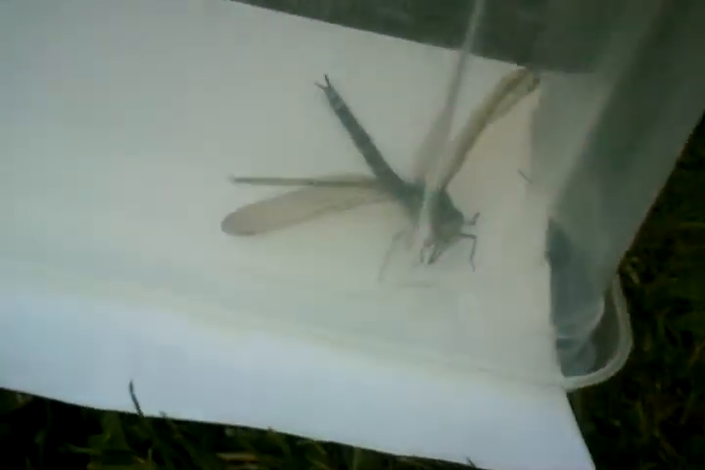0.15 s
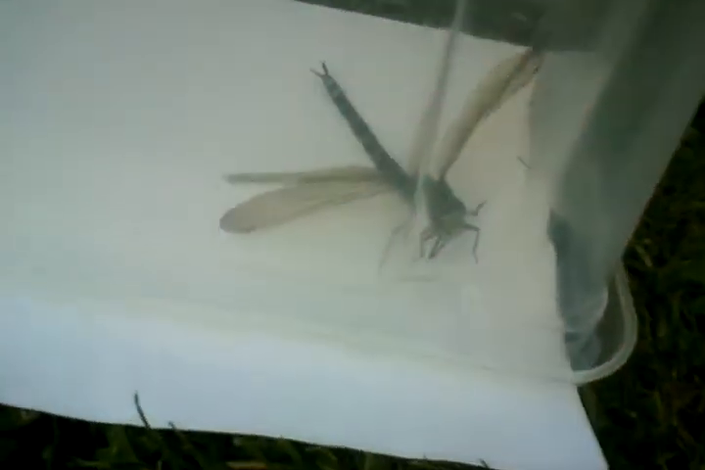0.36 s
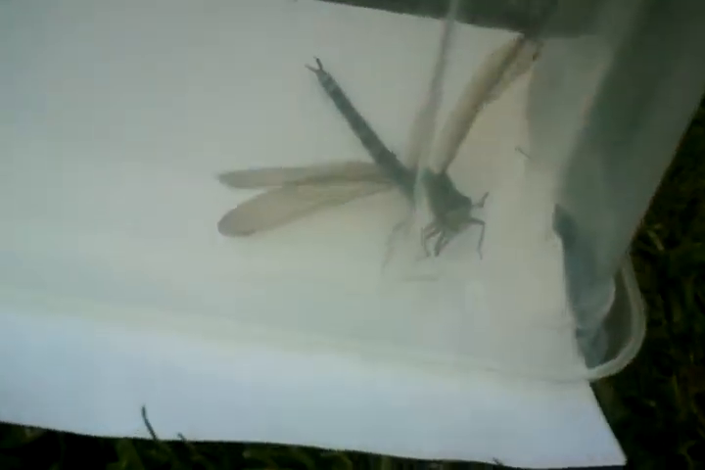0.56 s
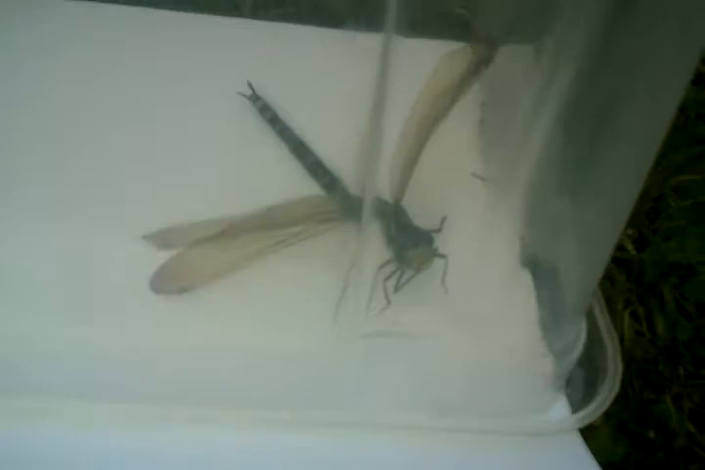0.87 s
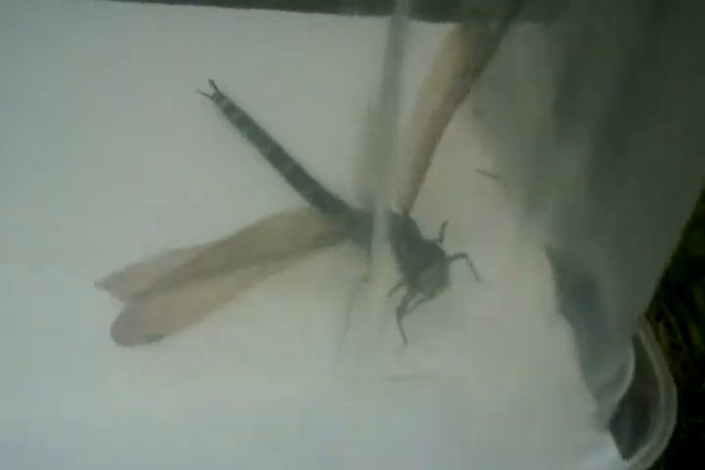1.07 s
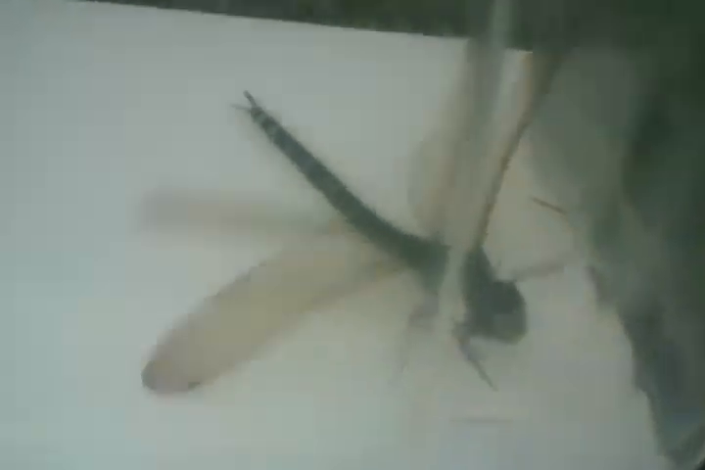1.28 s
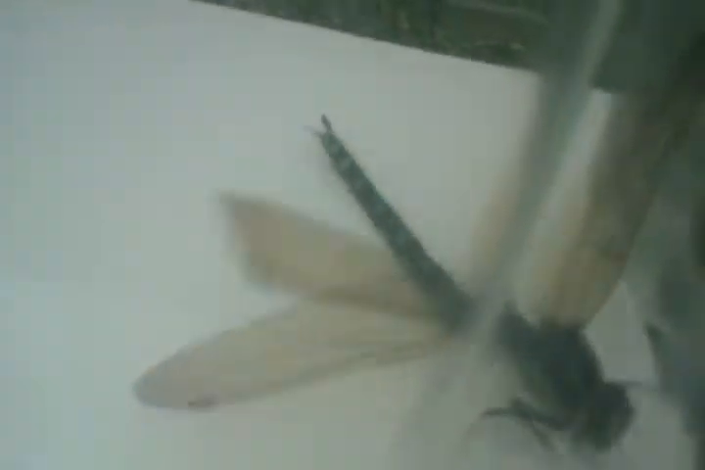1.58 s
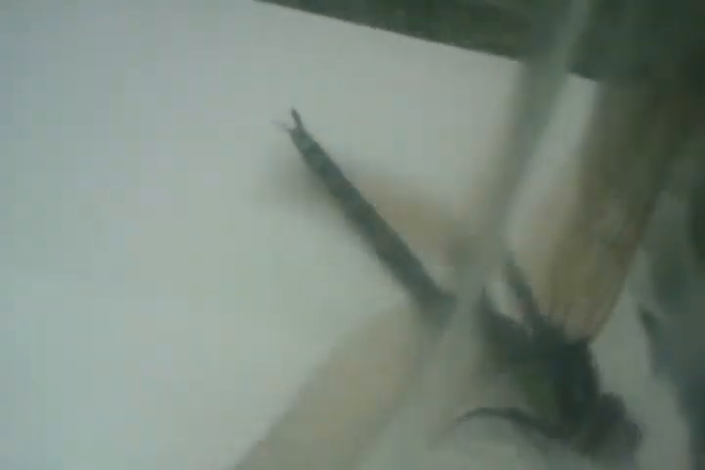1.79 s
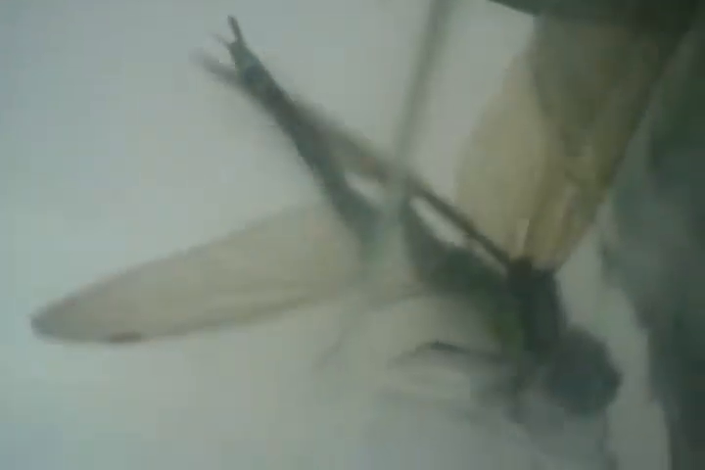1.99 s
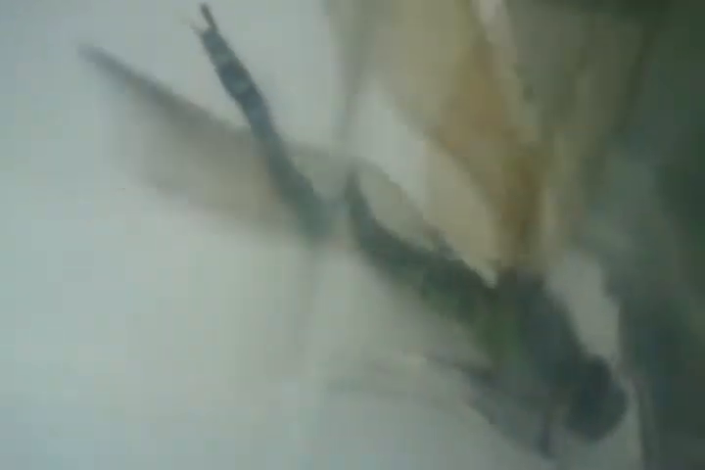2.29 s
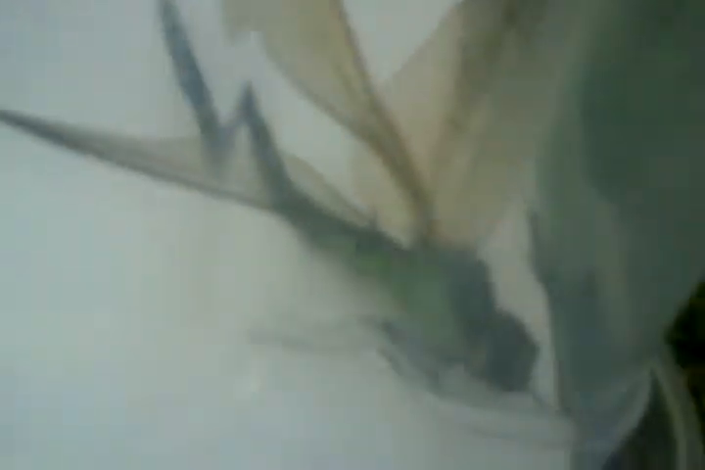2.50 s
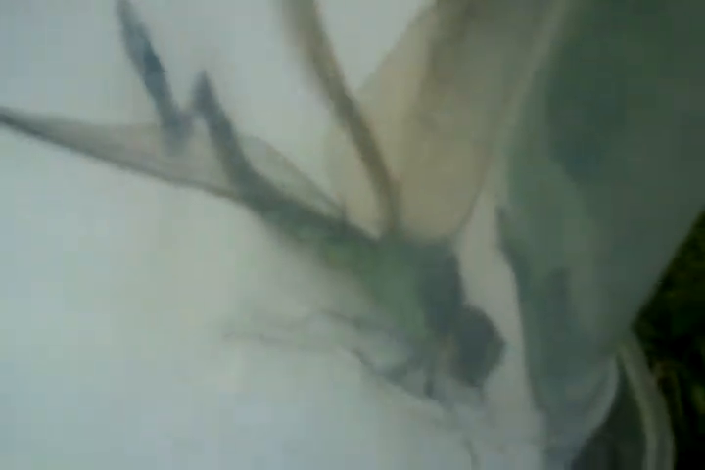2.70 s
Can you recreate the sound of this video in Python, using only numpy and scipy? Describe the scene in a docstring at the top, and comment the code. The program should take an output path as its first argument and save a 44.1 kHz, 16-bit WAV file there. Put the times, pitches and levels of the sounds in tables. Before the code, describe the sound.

A dragonfly rustles its wings and scrabbles in a plastic tub, making faint, uneven ticks, with a few sharper taps near the end. Outdoors, distant traffic rumbles and engines drone under a steady microphone hiss.

```python
"""On a lawn, a dragonfly in a plastic tub scrabbles, rubs its wings on the wall and beats them briefly.
Claws and wing veins tap the thin wall, which rings for a moment: each tap is a tick.
A dragging wing makes thousands of tiny taps a second, which blur into a rustle.
Behind it, far road traffic rumbles and engines drone over a steady microphone hiss."""
import sys
import numpy as np
from scipy import signal
from scipy.io import wavfile

SR = 44100
rng = np.random.default_rng(int(sys.argv[2]) if len(sys.argv) > 2 else 0)


def master_out(mix):
    """Clip the mix to full scale and print it as 16-bit PCM to the path in sys.argv[1]."""
    frames = np.transpose(np.atleast_2d(mix))
    ceiling = np.clip(frames, -1, 1)
    pcm = np.round(ceiling * 32767).astype(np.int16)
    wavfile.write(sys.argv[1], SR, pcm)


N = 125244

# The tones at which the tub's wall rings. Each row: pitch in Hz, relative level in dB,
# seconds to fade by 60 dB, group (0 low, 1 middle, 2 high, 3 top).
WALL_TONES = [(1450, 0, .016, 0), (1950, 0, .015, 0), (2550, 0, .013, 0), (3100, -2, .012, 0),
              (4050, -3, .012, 1), (4600, 0, .012, 1), (5150, -1, .011, 1), (5900, 0, .011, 2),
              (6550, -1, .010, 2), (7100, 0, .010, 2), (7750, 1, .009, 3), (8250, 4, .008, 3),
              (8750, 6, .006, 3)]


def from_db(db):
    """Turn decibels into a number to multiply a sound by."""
    return 10 ** (np.asarray(db) / 20)


def unit_level(sound):
    """Scale a sound so that its average (RMS) level is 1."""
    return sound / np.sqrt(np.mean(sound ** 2) + 1e-20)


def curve(rows, column=1):
    """Join a column's values with straight lines; each row starts with a time in seconds."""
    columns = np.transpose(rows)
    return np.interp(np.arange(N) / SR, columns[0], columns[column])


def drift(rate_hz):
    """A slow, smooth random wander, about 1 in size."""
    step, warm_up = 40, 2000  # one value every 40 samples; the first 2000 values are dropped
    keep = np.exp(-2 * np.pi * rate_hz * step / SR)
    noise = rng.standard_normal(N // step + warm_up + 2)
    slow = signal.lfilter([1], [1, -2 * keep, keep * keep], noise)[warm_up:]
    return np.interp(np.arange(N) / step, np.arange(len(slow)), unit_level(slow))


def ring(pushes, hz, fade_s):
    """Every push starts a tone that dies away by 60 dB in fade_s seconds."""
    keep = from_db(-60 / (fade_s * SR))
    angle = 2 * np.pi * hz / SR
    return signal.lfilter([0, np.sin(angle)], [1, -2 * keep * np.cos(angle), keep * keep], pushes + 1e-18)


def microphone_hiss():
    """The microphone's own even noise, with a broad lift in the treble."""
    white = rng.standard_normal(N)
    treble = unit_level(ring(white, hz=7400, fade_s=0.00074))
    return from_db(-57.5) * (white + from_db(-9.5) * treble)


def road_rumble():
    """Far traffic: bands of noise a quarter of an octave wide, each flickering slightly."""
    # The traffic's balance from bass to treble. Each row: pitch in Hz, relative level in dB.
    spectrum = [(12, -2.5), (22, -1.5), (30, -7.5), (45, -7.5), (100, -9.5), (160, -11), (340, -14),
                (520, -14.5), (660, -17.5), (780, -12), (1000, -13.5), (1150, -18.5), (1350, -22),
                (1900, -28), (2400, -35), (3300, -41), (5000, -61.5)]
    # Its gentle rise and fall. Each row: time in seconds, change in dB below split_hz, and above it.
    swells = [(0, -0.5, 1.5), (.35, 0, 0.5), (.7, -1, 0.5), (1.05, 1, 0.5), (1.4, -0.5, 0),
              (1.75, 0.5, -0.5), (2.1, 0.5, -1.5), (2.45, 0.5, -0.5), (2.84, 1, -2)]
    split_hz, flicker_db = 700, 0.47
    low_swell, high_swell = curve(swells, column=1), curve(swells, column=2)
    hz, db = np.transpose(spectrum)
    edges_hz = 10 * 2 ** np.arange(0, 9.3, 1 / 4)
    white = rng.standard_normal((2, N + SR))  # an extra second lets the filters settle
    rumble = 0
    for k, (low, high) in enumerate(zip(edges_hz, edges_hz[1:])):
        band_filter = signal.butter(2, [low, high], "band", fs=SR, output="sos")
        band = signal.sosfilt(band_filter, white[k % 2])[SR:]
        band_db = np.interp(np.log(low * high) / 2, np.log(hz), db)
        swell_db = high_swell if low > split_hz else low_swell
        rumble += band * from_db(band_db + swell_db + flicker_db * drift(rate_hz=2))
    return from_db(-39) * unit_level(rumble)


def engine_drones():
    """Far engines: noise narrowed twice around each pitch becomes a low, wavering note."""
    # The engine notes. Each row: pitch in Hz, filter width in Hz, level in dB before the swell.
    notes = [(43.5, 10, -48.5), (67.3, 13, -44.5), (82.5, 3.3, -49.5), (116.85, 13.2, -53),
             (145.9, 8, -71.5), (181, 11, -63)]
    # How they swell and sink together. Each row: time in seconds, change of level in dB.
    swells = [(0, -3), (.3, -1.5), (.48, 3), (.6, -1), (1, 1.5), (1.3, -4.5), (1.55, -2), (1.8, -9),
              (2.07, 1.5), (2.4, 1.5), (2.7, 3.5), (2.84, -3.5)]
    drone = 0
    for hz, width_hz, db in notes:
        fade_s = np.log(1000) / (np.pi * width_hz)  # a narrower note rings longer
        noise = rng.standard_normal(N + SR)
        note = ring(ring(noise, hz, fade_s), hz, fade_s)[SR:]
        drone += from_db(db) * unit_level(note)
    return drone * from_db(curve(swells))


def wing_rubs():
    """A wing drags over the wall, and its many tiny, uneven taps keep the wall ringing."""
    # The wing strokes. Each row: start in seconds, length in seconds, level in dB,
    # extra dB for the wall's low tones.
    strokes = [(.0, .025, -58, 0), (.16, .095, -55.5, 2), (.26, .05, -61, 1), (.31, .085, -57.5, 7),
               (.395, .09, -54.5, 1), (.57, .15, -63, 2), (.74, .085, -57, 1), (.855, .05, -57.5, 3),
               (.9, .065, -56, 0), (1.035, .1, -55.5, 2), (1.32, .09, -62, 0), (1.425, .03, -58, -3),
               (1.495, .04, -53.5, -2), (1.68, .1, -62, 0), (1.78, .14, -59, 2), (1.9, .09, -55.5, 1),
               (1.97, .1, -57, 2), (2.04, .27, -58, 3), (2.301, .013, -58, -2), (2.347, .013, -46.5, 5),
               (2.39, .008, -52, 2), (2.397, .013, -47.5, 5), (2.431, .017, -53, 0),
               (2.479, .014, -54.5, 3), (2.521, .024, -59, 6)]
    taps_per_s, tap_spread_db, top_tones_db = 3000, 2.2, -7
    edge_share = .4  # part of a stroke spent rising, and again falling
    ring_share = .45  # part of the ringing time left while a wing presses on the wall
    t = np.arange(N) / SR
    pressure, low_pressure = np.zeros(N), np.zeros(N)
    for start, length, db, low_db in strokes:
        to_nearest_end = np.minimum(t - start, start + length - t)
        ramp = np.clip(to_nearest_end / (edge_share * length), 0, 1)
        stroke = from_db(db) * np.sin(np.pi / 2 * ramp)
        pressure += stroke
        low_pressure += stroke * from_db(low_db)
    group_push = [low_pressure, pressure, pressure, pressure * from_db(top_tones_db)]
    tap_sizes = from_db(tap_spread_db * np.minimum(rng.exponential(1, N), 5))
    taps = tap_sizes * (rng.random(N) < taps_per_s / SR)
    rustle = 0
    for hz, db, fade_s, group in WALL_TONES:
        hits = taps * rng.standard_normal(N)  # a tap strikes each tone by a different amount
        damped_s = fade_s * ring_share
        steady_level = np.std(ring(hits, hz, damped_s))
        rustle += ring(hits * group_push[group], hz, damped_s) * from_db(db) / steady_level
    return rustle / np.sqrt(len(WALL_TONES))


def wall_ticks():
    """A claw or wing vein strikes the wall and sets all its tones ringing, a little different each time."""
    # The strikes. Each row: start in seconds, then strength in dB for the low, middle, high and top tones.
    strikes = [(0.1197, -64, -50, -56, -56), (0.1942, -64, -55, -53, -51), (0.2123, -58, -65, -48, -59),
               (0.2224, -60, -52, -55, -65), (0.2341, -64, -58, -49, -60), (0.2595, -64, -57, -55, -57),
               (0.2794, -48, -55, -52, -51), (0.3267, -58, -51, -55, -62), (0.4076, -60, -52, -56, -52),
               (0.4131, -58, -57, -48, -62), (0.416, -62, -51, -54, -65), (0.5326, -61, -58, -59, -58),
               (0.7286, -64, -53, -53, -55), (0.7897, -62, -52, -49, -52), (0.8705, -59, -49, -60, -61),
               (0.8966, -58, -52, -53, -56), (0.9178, -60, -61, -45, -45), (0.9261, -58, -53, -51, -56),
               (0.972, -63, -54, -56, -63), (1.0608, -58, -60, -52, -54), (1.0709, -58, -52, -51, -54),
               (1.1168, -64, -59, -53, -58), (1.1517, -64, -65, -61, -54), (1.3044, -64, -65, -54, -56),
               (1.3142, -58, -44, -46, -62), (1.3228, -62, -54, -50, -48), (1.3387, -48, -63, -65, -65),
               (1.3632, -49, -65, -65, -65), (1.3713, -59, -65, -49, -60), (1.3961, -63, -55, -54, -62),
               (1.515, -58, -56, -48, -57), (1.7519, -64, -59, -54, -60), (1.7981, -58, -60, -54, -64),
               (1.9627, -44, -55, -46, -52), (2.0088, -58, -58, -51, -58), (2.0739, -64, -59, -51, -58),
               (2.1288, -64, -54, -51, -62), (2.2141, -64, -53, -56, -62), (2.3059, -64, -56, -49, -56),
               (2.3457, -58, -53, -51, -59), (2.3481, -45, -42, -41, -52), (2.3896, -45, -47, -37, -48),
               (2.3959, -44, -49, -45, -51), (2.4023, -44, -47, -54, -54), (2.4308, -60, -50, -46, -57),
               (2.434, -58, -53, -46, -55), (2.4397, -56, -57, -52, -59), (2.4789, -46, -42, -43, -45),
               (2.5237, -54, -61, -57, -56)]
    rise_s, level_spread_db, pitch_spread = .0004, 1.0, .012
    ticks = np.zeros(N + SR)
    t = np.arange(SR // 20) / SR
    rise = np.minimum(t / rise_s, 1)
    hz, db, fade_s, group = np.transpose(WALL_TONES)[:, :, None]
    sign = (-1.) ** np.arange(len(WALL_TONES))[:, None]  # neighbouring tones start in opposite directions
    for start, *strength_db in strikes:
        level_chance, pitch_chance = rng.standard_normal((2,) + hz.shape)
        tone_db = np.array(strength_db)[group.round().astype(int)] + db + level_spread_db * level_chance
        fading = from_db(tone_db - 60 * t / fade_s)
        tones = np.sin(2 * np.pi * hz * (1 + pitch_spread * pitch_chance) * t)
        first = int(start * SR)
        ticks[first:first + len(t)] += rise * np.sum(sign * fading * tones, axis=0)
    return ticks[:N]


def scene():
    """Traffic, dragonfly and hiss added together in one channel."""
    return (road_rumble() + engine_drones() + wall_ticks() + wing_rubs() + microphone_hiss())[None]


def record(dry):
    """The microphone softens the treble, cuts off the very top and shifts the wave slightly off zero."""
    soften_hz, cut_hz, offset = 8750, 9330, .0109
    softened = signal.sosfilt(signal.butter(10, soften_hz, fs=SR, output="sos"), dry)
    return offset + signal.sosfilt(signal.cheby2(12, 60, cut_hz, fs=SR, output="sos"), softened)


dry = scene()
out = record(dry)
master_out(out)
```